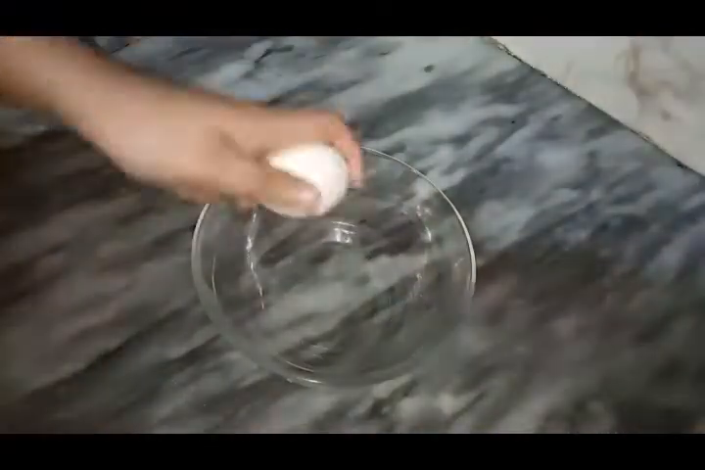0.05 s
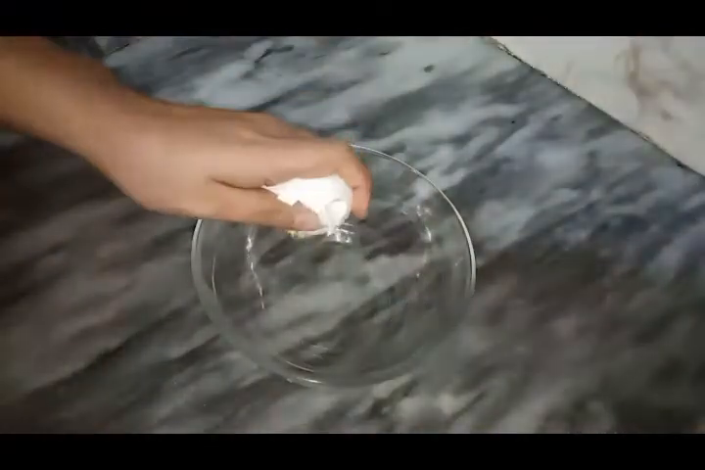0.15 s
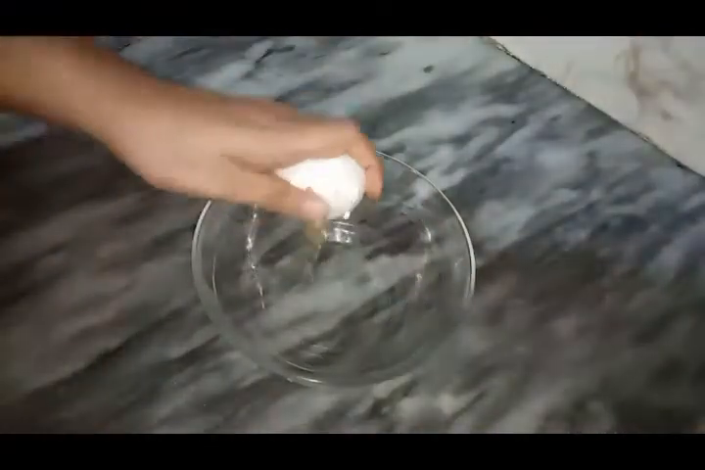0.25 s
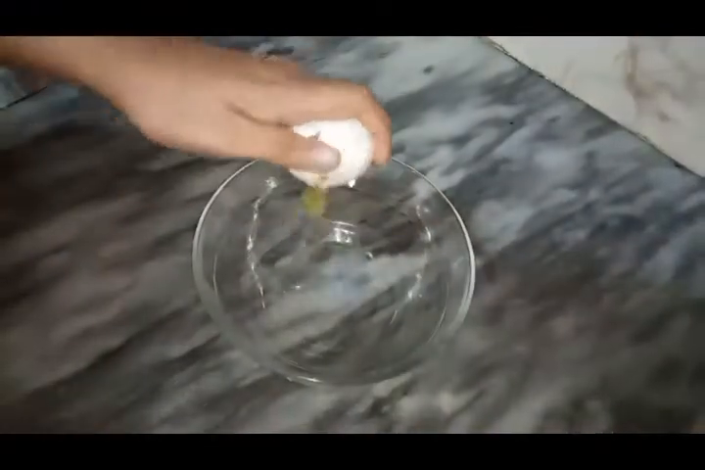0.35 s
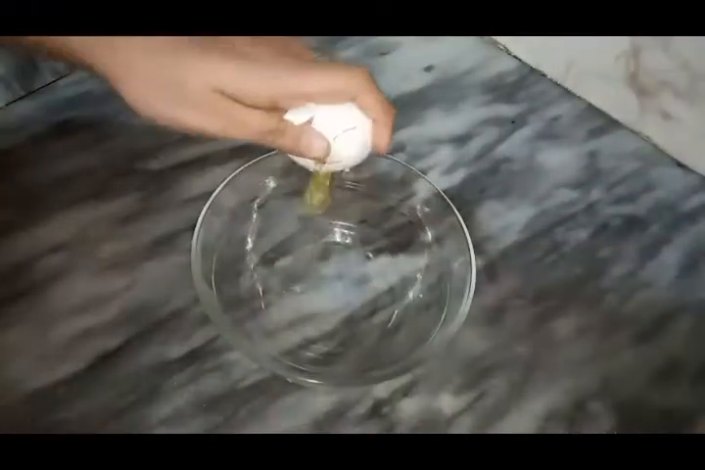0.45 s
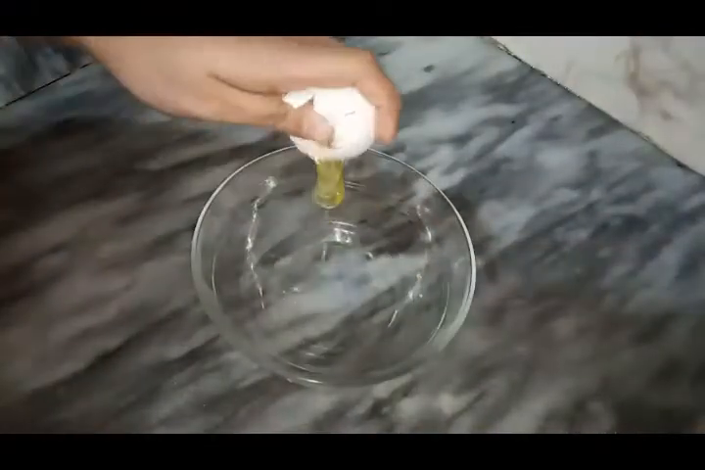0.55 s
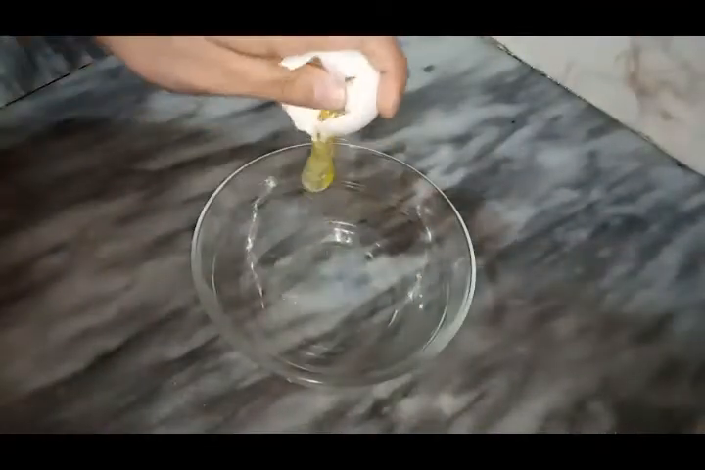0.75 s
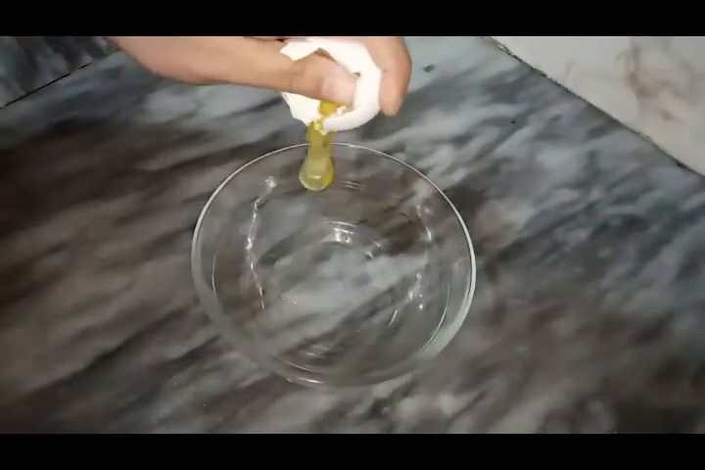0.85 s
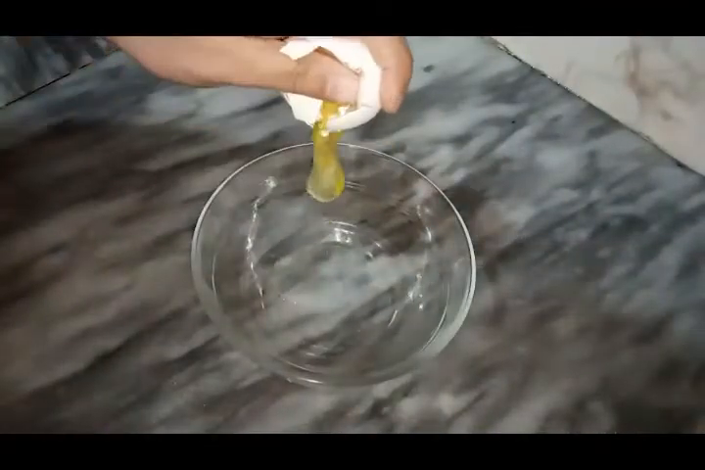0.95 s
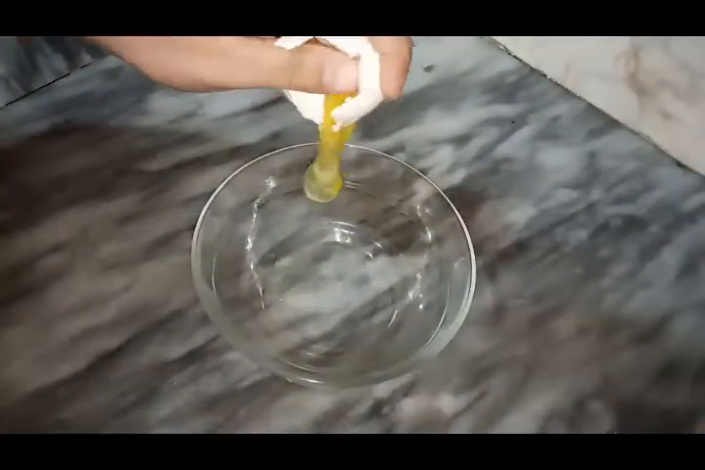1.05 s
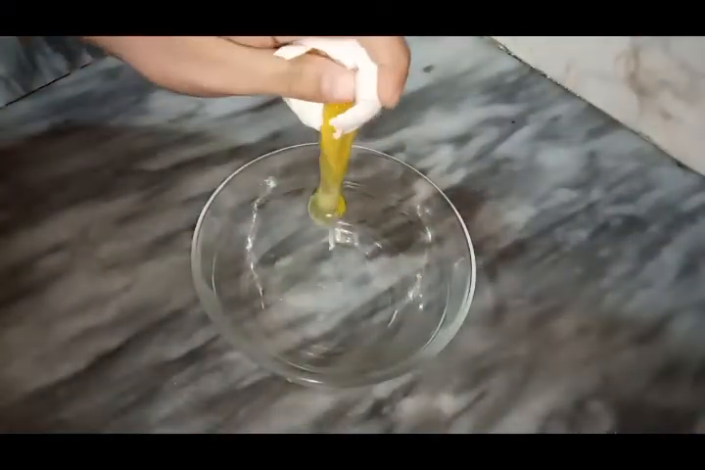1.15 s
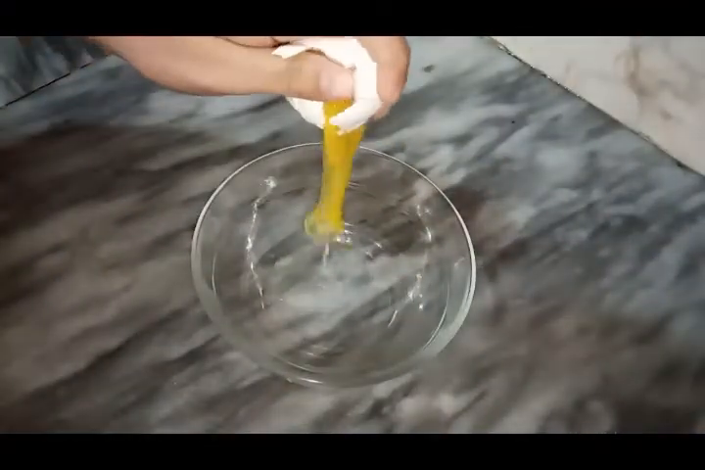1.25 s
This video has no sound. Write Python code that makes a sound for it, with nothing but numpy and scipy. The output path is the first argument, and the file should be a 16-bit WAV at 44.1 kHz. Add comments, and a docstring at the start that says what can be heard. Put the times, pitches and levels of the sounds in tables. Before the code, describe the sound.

Eggshell cracking and crunching under a thumb, with a faint wet squelch.

```python
"""Egg opened over a glass bowl

A stone counter in a small kitchen, the microphone close to the hands. A thumb breaks the shell, which
gives way in crunches of tiny fractures and in single snaps, coloured by the egg's wet hollow.
A bubble pops, the white squelches, the bowl rings faintly, and the room answers over a low hum."""
import sys
import numpy as np
from scipy import signal
from scipy.fft import rfft, irfft, next_fast_len
from scipy.io import wavfile

SR = 44100
rng = np.random.default_rng(int(sys.argv[2]) if len(sys.argv) > 2 else 0)


def master(y):
    """Save y as 16-bit WAV."""
    cut = np.clip(np.atleast_2d(y).T, -1, 1)
    pcm = np.round(cut * 32767)  # scale
    wavfile.write(sys.argv[1], SR, pcm.astype(np.int16))


N = 57330
T = np.arange(N) / SR
FFT_SIZE = 2 * next_fast_len((N + SR // 2) // 2)
HZ = np.fft.rfftfreq(FFT_SIZE, 1 / SR)


def amp(db):
    """Decibels to gain."""
    return 10 ** (np.asarray(db) / 20)


def unit_rms(x):
    """Scale to rms 1."""
    return x / np.sqrt(np.mean(np.abs(x) ** 2) + 1e-20)


def curve(points, hz):
    """Interpolate (frequency, value) points on a log frequency axis."""
    point_hz, values = np.transpose(points)
    return np.interp(np.log(hz + 1), np.log(point_hz + 1), values)


def fade(t, t60):
    """Gain that loses 60 dB in t60 seconds."""
    return np.exp(-np.log(1000) * np.maximum(t, 0) / t60)


def swell(peak_s, db, rise_s, t60):
    """An envelope that grows to its peak and dies away."""
    rise = np.clip(1 + (T - peak_s) / rise_s, 0, 1) ** 2
    return amp(db) * rise * fade(T - peak_s, t60)


def filtered(x, response):
    """Pass x through a frequency response."""
    return irfft(rfft(x, FFT_SIZE) * response, FFT_SIZE)[:N]


def minimum_phase(db):
    """A response with the given gain that rings only after it is struck."""
    cepstrum = irfft(np.log(amp(db)), FFT_SIZE)
    cepstrum[1:FFT_SIZE // 2] *= 2
    cepstrum[FFT_SIZE // 2 + 1:] = 0
    return np.exp(rfft(cepstrum))


def resonance(hz, q):
    """A band-pass response of unit energy."""
    damping = 1j * HZ * hz / q
    return unit_rms(damping / (hz ** 2 - HZ ** 2 + damping))


def clicks(per_s=6500, spread_db=2.5):
    """Random clicks of uneven size, rms 1."""
    hits = rng.random(N) < per_s / SR
    sizes = amp(spread_db * np.clip(rng.standard_normal(N), -2, 2))
    return unit_rms(hits * sizes * rng.choice([-1, 1], N))


# Spectrum of the kitchen's hiss: (frequency [Hz], relative level [dB])
HISS_SPECTRUM = [(25, -24), (70, -5.5), (160, -7), (350, -9.5), (700, -12.5), (1300, -15.5), (2100, -17.5),
                 (3800, -20.5), (5200, -27.5), (7300, -24.5), (10000, -32), (15500, -35.5)]


def room_tone(hum_hz=127.6, hum_db=-62, hiss_db=-65.5):
    """Behind everything, a wavering low hum and faint hiss."""
    hum = filtered(rng.standard_normal(FFT_SIZE), resonance(hum_hz, q=3.76) ** 2)
    hiss = filtered(rng.standard_normal(FFT_SIZE), amp(curve(HISS_SPECTRUM, HZ)))
    return amp(hum_db) * unit_rms(hum) + amp(hiss_db) * unit_rms(hiss)


# Reverberation of the small kitchen: (frequency [Hz], t60 [s])
ROOM_DECAY = [(200, 0.12), (1500, 0.37), (7000, 0.22), (15000, 0.13)]


def kitchen_reflections(sound, room_db=-13, counter_db=-8, counter_t60=0.038):
    """Quick reflections off bowl and counter reach the microphone with the room's longer tail."""
    hz, t, noise = signal.stft(rng.standard_normal(SR // 2), SR, nperseg=256)
    decay = fade(t, curve(ROOM_DECAY, hz)[:, None])
    tail = signal.istft(noise * decay, SR, nperseg=256)[1]
    near = rng.standard_normal(len(tail)) * fade(T[:len(tail)], counter_t60)
    echoes = amp(room_db) * tail / np.linalg.norm(tail) + amp(counter_db) * near / np.linalg.norm(near)
    echoes = np.pad(echoes, (SR // 1000, 0))  # 1 ms behind the direct sound
    return filtered(sound, rfft(echoes, FFT_SIZE))


# Two high modes of the glass: (frequency [Hz], starting level [dB], t60 [s])
AFTERRING_MODES = [(7880, -59.5, 0.13), (9710, -68, 0.13)]


def bowl_afterring():
    """At the start the bowl is still singing from an earlier tap."""
    return sum(amp(db) * fade(T, t60) * np.sin(2 * np.pi * hz * T) for hz, db, t60 in AFTERRING_MODES)


# Modes of the glass bowl: (frequency [Hz], energy gain [dB], t60 [s])
BOWL_MODES = [(1072, -27, 0.072), (1603, -32, 0.19), (1959, -30.5, 0.14), (2190, -32, 0.063),
              (4040, -25.5, 0.084), (6230, -22.5, 0.04), (6360, -42, 0.069), (7390, -29, 0.07)]


def bowl_ring(sound):
    """Just under the egg, the glass rings faintly along with it."""
    ring = np.zeros(N)
    for hz, db, t60 in BOWL_MODES:
        mode = np.sin(2 * np.pi * hz * T) * fade(T, t60)
        ring += amp(db) * mode / np.linalg.norm(mode)
    return filtered(sound, rfft(ring, FFT_SIZE))


# Ring of the wet gap between the shell halves as it opens: (time [s], pitch [Hz], level [dB])
WET_GAP = [(0.679, 1460, -60), (.705, 1635, -55.5), (.745, 1910, -57), (.765, 1930, -45.5),
           (.81, 2180, -65), (0.844, 2270, -48.5), (0.876, 2200, -64), (0.906, 1998, -39),
           (0.939, 1930, -63.5), (1.025, 1810, -68.5), (1.07, 1880, -74)]


def squelch(width_hz=260):
    """Sticky little clicks drive one narrow resonance whose pitch climbs and sinks again."""
    times, hz, db = np.transpose(WET_GAP)
    carrier = np.exp(2j * np.pi * np.cumsum(np.interp(T, times, hz)) / SR)
    low_pass = signal.butter(2, width_hz / 2, fs=SR, output="sos")
    ring = np.real(carrier * signal.sosfilt(low_pass, clicks() / carrier))  # a band around the pitch
    opening = (T > times[0]) & (T < times[-1])
    return unit_rms(ring) * amp(np.interp(T, times, db)) * opening


def bubble(start_s=0.2205, db=-32, hz=2814, rise_hz_per_s=51000, t60=0.02):
    """A bubble pops in the egg white: a short ring that rises in pitch."""
    age = np.maximum(T - start_s, 0)
    cycles = hz * age + rise_hz_per_s * age ** 2 / 2
    return amp(db) * fade(age, t60) * np.sin(2 * np.pi * cycles)


# Spectrum of the shell caving in: (frequency [Hz], relative level [dB])
CRUSH_SPECTRUM = [(80, -38), (180, -5), (300, -1), (450, -1), (600, 0), (820, 5.5), (1150, -16),
                  (2500, -44)]


def crush():
    """The low, soft body of the first collapse under the thumb."""
    body = unit_rms(filtered(clicks(), minimum_phase(curve(CRUSH_SPECTRUM, HZ))))
    return body * swell(peak_s=0.169, db=-47.5, rise_s=0.034, t60=0.2)


# Response of the eggshell: (frequency [Hz], relative level [dB])
SHELL_SPECTRUM = [(100, -21.5), (450, -18), (700, -13.5), (1000, -12), (2000, -7.5), (3200, -1.5),
                  (4200, -0.5), (5300, -5), (6300, 2), (7100, 8), (7800, 6.5), (8800, -2.5), (11000, -7),
                  (13500, -2), (16000, -10.5)]


def through_egg(force, treble_db, hollow_hz, hollow_db, air_db, hollow_q):
    """A fracture sounds through the shell, the egg's wet hollow and the air in the bowl."""
    treble_shelf = amp(treble_db * HZ ** 2 / (3100 ** 2 + HZ ** 2))  # half its dB at 3100 Hz
    shell = unit_rms(amp(curve(SHELL_SPECTRUM, HZ))) * treble_shelf
    low_cut = 1 / (1 + (865 / (HZ + 1)) ** 8)  # small cavities radiate little below 865 Hz
    hollow = amp(hollow_db) * np.abs(resonance(hollow_hz, hollow_q)) * low_cut
    bowl_air = amp(air_db) * unit_rms(np.abs(resonance(hz=1125, q=3.5)) * low_cut)
    power = shell ** 2 + hollow ** 2 + bowl_air ** 2
    return filtered(force, minimum_phase(10 * np.log10(power)))


# Runs of tiny fractures: (peak time [s], force level [dB], rise [s], t60 [s], fracture rate [1/s],
# treble [dB], hollow pitch [Hz], hollow gain [dB], bowl air gain [dB])
SHELL_CRUNCHES = [(0.124, -58, 0.015, 0.099, 1100, -1.5, 3000, -15, -16),
                  (0.169, -27.5, 0.034, 0.074, 6750, 1.5, 3300, -20, -48),
                  (.283, -60, 0.024, .1, 2250, 2.5, 1600, -9.5, -2.5),
                  (0.36, -44.5, 0.024, 0.1, 5300, -2, 2000, -31, -9.5),
                  (.503, -57.5, 0.046, 0.2, 1320, 0.5, 1600, -6, -4),
                  (0.593, -33.5, 0.021, 0.093, 16800, 3, 2420, -5.5, -13),
                  (0.605, -35.5, 0.018, 0.099, 10000, 3.5, 1690, -3, -9),
                  (.708, -49, 0.027, 0.1, 2650, -0.5, 1350, 1.5, -4),
                  (.739, -49.5, 0.012, 0.06, 4100, 1.5, 1500, -2, -7),
                  (0.773, -51, 0.03, 0.034, 1500, -3, 1220, -9, -5.5),
                  (0.786, -49, 0.016, 0.031, 1900, -1.5, 3880, 5, -21),
                  (0.8, -50, 0.011, 0.048, 1700, 6.5, 2220, -11, -10),
                  (.842, -52.5, 0.037, 0.12, 2000, -16, 3500, 2, -19),
                  (0.902, -39, 0.041, .12, 5000, 1, 2150, -8, -9),
                  (1.055, -61.5, 0.057, 0.089, 780, 1, 3520, 1.5, -14),
                  (1.145, -58, 0.027, 0.15, 1800, -6, 3650, -4.5, -7)]


def crunches():
    """The shell gives way in dense runs of fractures that swell and die out."""
    return sum(through_egg(clicks(per_s) * swell(peak_s, db, rise_s, t60), *colour, hollow_q=8)
               for peak_s, db, rise_s, t60, per_s, *colour in SHELL_CRUNCHES)


# Single breaks: (time [s], force level [dB], time for the crumbling to fall 30 dB [s],
# treble [dB], hollow pitch [Hz], hollow gain [dB], bowl air gain [dB])
SHELL_SNAPS = [(0.1427, -18, 0.019, -5, 3100, -9.5, -38), (0.1617, -16, 0.0075, -3, 2960, -23, -10),
               (.1650, -13.5, 0.005, 7, 3870, -9, -22), (0.1722, -25, .005, 15, 3000, -25, -23),
               (0.193, -22.5, .02, 9.5, 3550, -14, -23), (0.1983, -20.5, 0.013, 7, 2980, -17, -20),
               (0.2056, -19, 0.039, 6.5, 3020, -20, -39), (0.2225, -23.5, .01, -8, 3120, 2.5, -31),
               (0.2713, -30.5, .01, 3.5, 2040, -13, -25), (0.3342, -22.5, 0.039, -7.5, 2040, -13.5, -28),
               (0.3624, -17, 0.0052, 3.5, 4500, -2, -32), (0.3636, -8.5, 0.0031, 0, 1780, -12.5, -5.5),
               (.4580, -36, .02, 6, 2000, -30, -10), (.4850, -35, 0.068, 8.5, 1630, -5, -0.5),
               (.5262, -27.5, 0.014, -5, 3020, -12, -11), (.5570, -29, 0.014, 0, 2000, -13, -8),
               (0.6025, -6, .002, -3, 2940, 3, -4.5), (0.694, -32, 0.013, -5, 1750, 6, 1.5),
               (0.7421, -19, 0.0094, -4.5, 1930, 1.5, -15), (0.7585, -27, .012, 5.5, 1950, 2, 3.5),
               (.7622, -24, 0.016, 5, 2050, 4.5, -0.5), (0.7846, -15.5, 0.018, 1, 2060, -2.5, -31),
               (0.8004, -33, 0.005, 12, 2200, -15, -21), (0.8408, -29.5, 0.03, -17, 3570, 8, -23),
               (0.8463, -19.5, .005, -5, 2500, 8.5, -22), (0.8789, -29.5, 0.034, -6, 2150, -10, 1),
               (0.903, -18.5, 0.012, 5, 1990, -28, -36), (0.9568, -28, 0.012, 3, 1770, -14, -3),
               (.9596, -24, 0.016, 2.5, 1810, -1, -1.5), (.9930, -33.5, 0.016, 0, 1940, -25, -12),
               (1.0870, -37, 0.014, -0.5, 3620, 2, 4.5), (1.1130, -28.5, .008, 1.5, 2020, -1, -0.5),
               (1.1495, -37, 0.017, -0.5, 2060, 3, -25), (1.1555, -30, .008, -13, 3660, -2.5, -11),
               (1.2474, -36, 0.015, -8, 2020, -5, -4.5)]


def snaps(crumble_db=1.5):
    """Close to the microphone, each snap is one impulse trailed by crumbling fragments."""
    sound = np.zeros(N)
    for start_s, db, crumble_s, *colour in SHELL_SNAPS:
        start = round(start_s * SR)
        force = clicks() * (np.arange(N) > start) * fade(T - start_s, 2 * crumble_s)
        force *= amp(crumble_db) / (np.linalg.norm(force) + 1e-12)  # fragments against the impulse
        force[start] = 1
        sound += through_egg(amp(db) * force / np.linalg.norm(force), *colour, hollow_q=3.5)
    return sound


def scene():
    """One close microphone: the egg in front, the bowl below, the kitchen around them."""
    egg = snaps() + crunches() + crush() + bubble() + squelch()
    return (egg + bowl_ring(egg) + kitchen_reflections(egg) + bowl_afterring() + room_tone())[None]


def record(dry):
    """The microphone's signal is cut off steeply above 15.8 kHz."""
    band_limit = 1 / (1 + (HZ / 15800) ** 400)
    return np.array([filtered(channel, band_limit) for channel in dry])


dry = scene()
out = record(dry)
master(out)
```